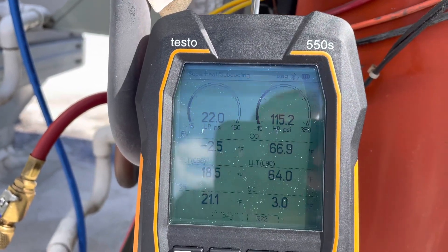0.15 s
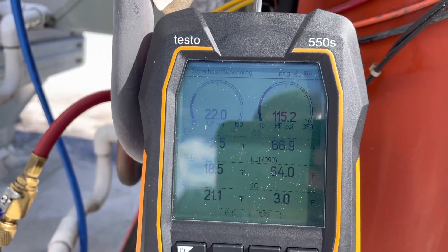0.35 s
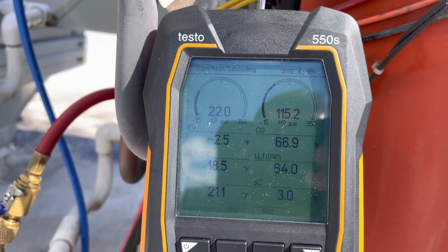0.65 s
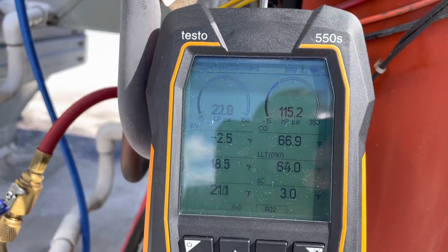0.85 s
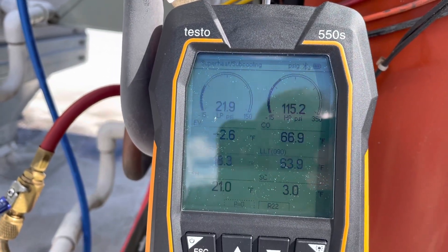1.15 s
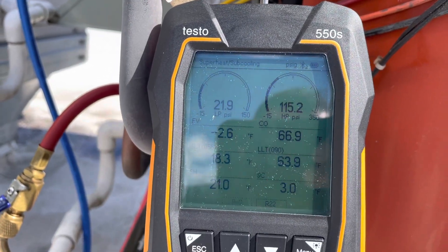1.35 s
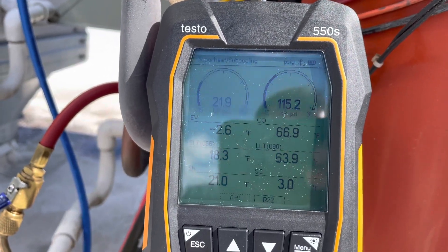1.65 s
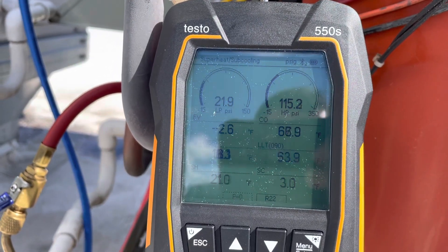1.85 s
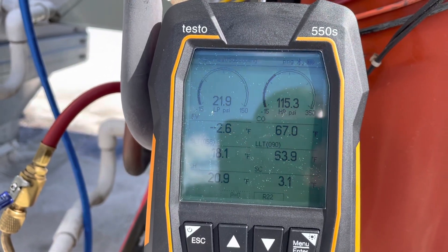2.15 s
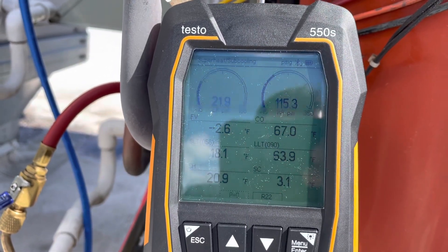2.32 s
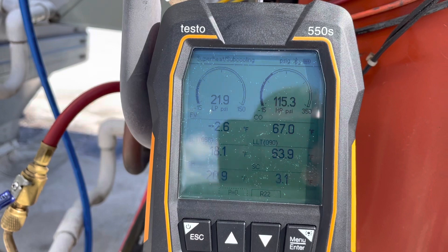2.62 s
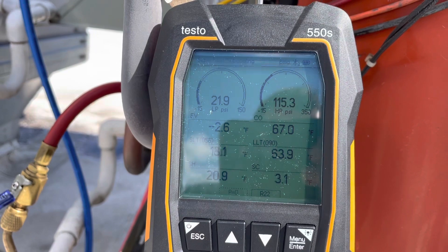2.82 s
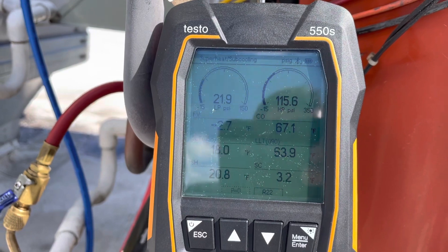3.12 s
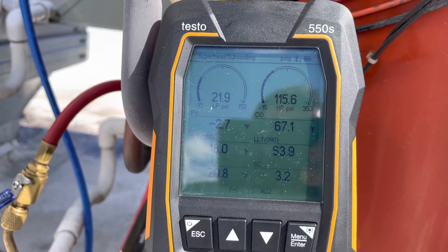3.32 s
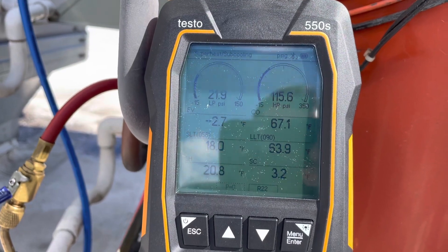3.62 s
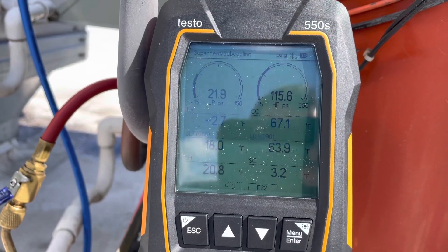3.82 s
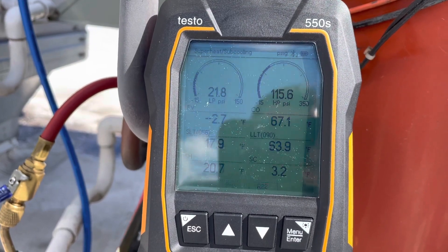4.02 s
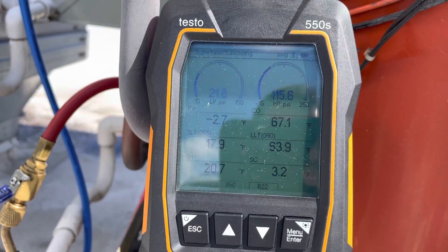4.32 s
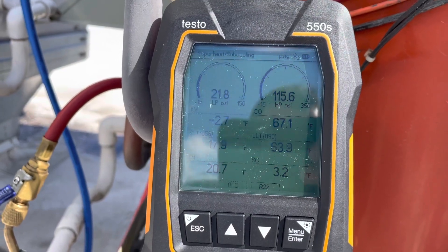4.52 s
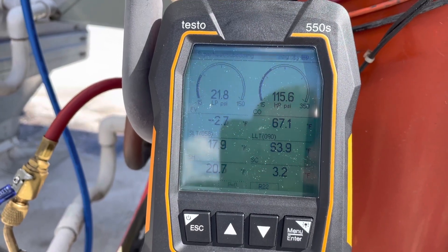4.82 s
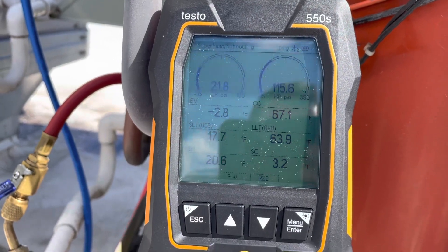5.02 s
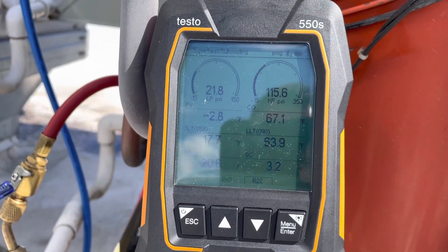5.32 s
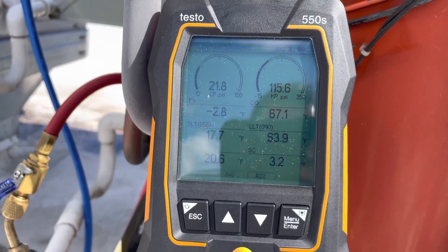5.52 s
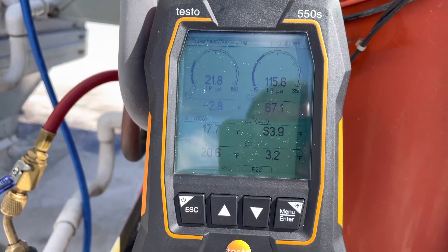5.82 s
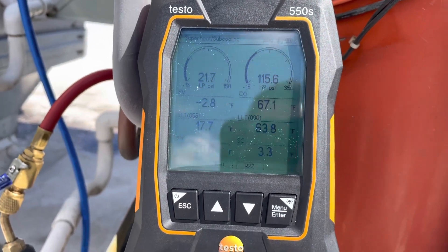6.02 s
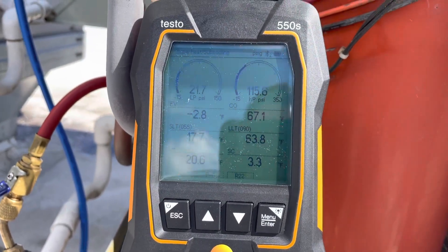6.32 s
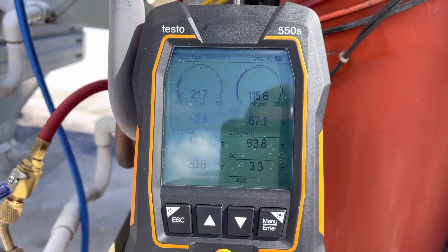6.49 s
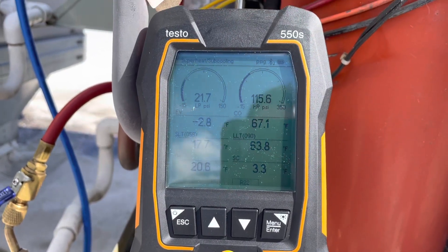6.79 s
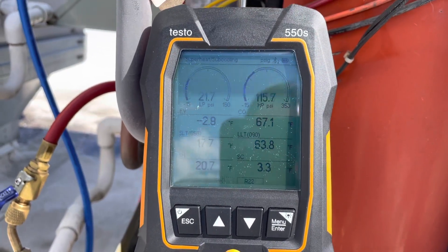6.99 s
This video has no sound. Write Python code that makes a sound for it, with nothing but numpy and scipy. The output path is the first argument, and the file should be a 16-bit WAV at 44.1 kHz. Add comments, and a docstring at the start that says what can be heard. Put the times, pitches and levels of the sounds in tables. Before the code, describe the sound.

A handheld stereo microphone near a running air conditioner picks up a constant, fast-pulsing compressor drone with fan and gas hiss. Early gusts rumble and flutter with sharp puffs around one and a half seconds. A calmer middle leaves the machine clear; late, strong gusts thud on the microphone and the buzz turns slightly duller, with more ringing.

```python
"""A rooftop, a phone with two microphone ports held close to a cooling unit in gusty wind.
Behind, the motor windings hum as steady sines, and fan air and gas hiss as shaped stereo noise.
Wind on the ports moans (a drifting sine), rumbles, flutters and rustles (noise), and single eddies puff.
In front, the compressor buzzes: a sum of shaft harmonics repeats about 59 times a second, no two turns alike."""
import sys
import numpy as np
from scipy import signal
from scipy.fft import rfft, irfft, next_fast_len
from scipy.io import wavfile
from scipy.ndimage import uniform_filter1d, map_coordinates

SR = 44100
rng = np.random.default_rng(int(sys.argv[2]) if len(sys.argv) > 2 else 0)


def persist_wave(psi):
    """Save psi, clipped to +-1, as 16-bit WAV."""
    counts = np.round(np.clip(psi, -1, 1) * 32767).astype(np.int16)
    wavfile.write(sys.argv[1], SR, np.atleast_2d(counts).T)


N = 315315  # length in samples

# Motor hum: f/Hz, level/dB (rms, before a slow waver)
MAINS_HUM = [(120, -44), (240, -45.5), (480, -46)]

# Hiss spectrum: f/Hz, relative density/dB
HISS_SPECTRUM = [(150, -120), (300, 11.5), (700, 11.5), (1300, 3.5), (1800, 1.5), (2200, 3.5), (2800, -1),
                 (3500, -3.5), (4800, 0.5), (5300, -5), (5900, -0.5), (6500, -6), (7050, 0), (7450, 2),
                 (7800, -31), (10400, -8), (12000, -12), (13400, -20.5), (14200, -17), (15700, -23)]
# Likeness of the two ports in the hiss: f/Hz, correlation (0-1)
PORT_LIKENESS = [(300, .5), (1200, .25), (2200, .55), (3000, .4), (5000, .5), (6000, .96), (7000, .75),
                 (7700, .995), (8800, .995), (9500, .85), (10800, .995), (12400, .995), (13300, .6),
                 (13900, .995)]
# Lead of the left port, for the hiss and the upper compressor tones: f/Hz, phase/rad
LEFT_LEAD = [(300, .2), (900, .8), (1500, -1), (2800, 1), (3500, 0), (4500, 1.2), (5600, .1), (6300, -.2),
             (7600, -3.14), (8800, -3.14), (10600, -6.28), (12900, -6.28), (13700, -9.42), (16000, -9.42)]

# Gusts: t/s, strength/dB, power share of the higher-pitched rumble (0-1)
GUSTS = [(0, -22.5, 0.55), (.62, -20, 0), (.76, -25, 0.04), (.9, -20.5, 0.08), (1.15, -17.5, 0.2),
         (1.45, -25.5, 0.54), (1.51, -29, .4), (1.6, -20.5, 0.3), (1.75, -24.5, 0.45), (1.92, -27.5, 0.46),
         (2.55, -29, 1), (3.45, -31, 0.76), (3.78, -27.5, 1), (4.0, -32.5, 0.96), (4.55, -33.5, 0.5),
         (4.9, -24.5, 0.75), (5.35, -27, 0.73), (5.9, -19, 0.7), (6.07, -21, 0.4), (6.22, -23, 0.5),
         (6.42, -23.5, 0.9), (6.62, -28, 0.8), (6.82, -28, 0.8), (7.15, -29.5, 0.8)]
# Brief surges in the flow: t/s, half length/s, rise of the flutter/dB, share of that rise in the rustle
FLOW_SURGES = [(1.08, 0.016, 6.5, 0.44), (1.41, 0.045, 11.5, 0.4), (1.564, 0.014, 12, 0.83),
               (1.696, 0.044, 9.5, 0.12), (2.115, 0.019, 8, 0.73), (2.448, 0.036, 6, 1.4),
               (2.612, 0.034, 4, 0.77), (2.822, 0.013, 5.5, 0.86), (2.98, 0.019, 5.5, 0.35),
               (3.286, 0.056, 5.5, 0.98), (3.777, 0.033, 5, .5), (4.098, 0.06, 4.5, 0.35),
               (4.38, 0.051, 4, 1), (5.06, 0.04, 1, .5), (5.382, 0.012, 7, .3), (5.876, 0.017, 9, 0.79),
               (5.97, 0.03, 7, .1), (6.157, 0.035, 5.5, 0.27), (6.268, 0.063, 6.5, 1.34),
               (6.575, 0.066, 7, 0.97), (6.668, 0.026, 5, 0.31), (7.046, 0.011, 10, 0.54)]
# Single eddies bursting on the ports: t/s, level/dB (nominal peak), f/Hz
EDDY_PUFFS = [(1.016, -13.5, 92), (1.077, -21, 383), (1.088, -13, 124), (1.164, -20, 73),
              (1.232, -8.5, 124), (1.404, -12.5, 482), (1.408, -11, 150), (1.412, -14, 280),
              (1.426, -11, 255), (1.434, -8, 110), (1.442, -10, 380), (1.46, -16, 330), (1.47, -7, 89),
              (1.475, -6, 267), (1.555, -13, 189), (1.656, -17, 485), (1.718, -17.5, 380),
              (2.271, -15.5, 400), (2.395, -20, 300), (2.425, -18, 600), (2.429, -20, 450),
              (2.434, -14.5, 280), (2.44, -24, 500), (2.452, -18, 400), (2.455, -13, 210),
              (2.477, -13, 380), (2.482, -21, 131), (2.487, -12.5, 437), (2.598, -12, 427),
              (2.637, -17, 298), (2.81, -14, 500), (3.271, -17, 335), (5.641, -12, 65.6), (5.721, -22, 72),
              (5.774, -11.5, 58.5), (5.791, -12.5, 142), (5.886, -2.5, 106), (5.956, -8.5, 96),
              (5.983, -7, 107), (6.135, -4.5, 88), (6.188, -8.5, 109), (6.212, -11, 74.4),
              (6.249, -7.5, 330), (6.252, -10, 145), (6.271, -8.5, 157), (6.328, -17, 96),
              (6.542, -13, 140), (6.553, -19, 200), (6.556, -16, 560), (6.561, -12, 515), (6.567, -7, 510),
              (6.572, -5, 463), (6.577, -5.5, 300), (6.58, -16, 125), (6.593, -21, 110), (6.605, -18, 332),
              (6.608, -10, 332)]
# Wind noise spectra, each: f/Hz, relative density/dB (the rumble before its shift up or down)
RUMBLE_SPECTRUM = [(12, -36), (25, -13), (40, -14), (58, 2), (75, -0.5), (110, -10.5), (150, -25),
                   (250, -19), (500, -120)]
FLUTTER_SPECTRUM = [(50, -41), (110, 3), (200, -2), (300, -5.5), (450, -20), (1200, -120)]
RUSTLE_SPECTRUM = [(150, -49), (350, 4), (600, 3.5), (1000, -8), (1600, -17), (4000, -120)]

# Lower compressor tones: multiple of the shaft speed, mid level/dB, side level/dB (rms, before variation)
SHAFT_TONES = [(1, -38, -56), (2, -47, -55), (3, -44, -59), (4, -43, -57), (5, -36, -51), (6, -43, -48),
               (7, -47, -56), (8, -35, -41), (9, -44, -55), (10, -52, -60), (11, -60, -50), (12, -50, -54),
               (13, -58, -64), (14, -47, -57), (15, -49, -54), (16, -51, -51), (17, -56, -48),
               (18, -47, -59), (19, -53, -54), (20, -60, -58), (21, -48, -48), (22, -46, -60),
               (23, -49, -60), (24, -64, -68), (25, -50, -51), (26, -63, -61), (27, -67, -65),
               (28, -64, -62), (29, -55, -63), (30, -60, -68), (31, -62, -65), (32, -52, -59),
               (33, -66, -78), (34, -53, -65), (35, -52, -61), (36, -51, -62), (37, -59, -63),
               (38, -55, -65), (39, -47, -56), (40, -57, -68), (41, -54, -67), (42, -57, -56),
               (43, -58, -67), (44, -70, -66), (45, -59, -67), (46, -51, -54), (47, -60, -60),
               (48, -59, -60), (49, -63, -71), (50, -66, -70), (51, -60, -56), (52, -66, -66),
               (53, -61, -63), (54, -54, -69), (55, -62, -74), (56, -63, -75), (57, -55, -59),
               (58, -51, -65), (59, -54, -66), (60, -58, -73), (61, -53, -72), (62, -53, -63),
               (63, -64, -68), (64, -64, -80), (65, -61, -70), (66, -51, -55), (67, -54, -62),
               (68, -57, -55), (69, -71, -67), (70, -55, -68), (71, -63, -66), (72, -53, -54),
               (73, -55, -54), (74, -63, -61), (75, -53, -54), (76, -59, -57), (77, -53, -58),
               (78, -60, -63), (79, -59, -60), (80, -59, -64), (81, -56, -74), (82, -66, -66),
               (83, -61, -68), (84, -68, -77), (85, -61, -64), (86, -67, -60), (87, -60, -65),
               (88, -57, -74), (89, -51, -68), (90, -51, -59), (91, -51, -66), (92, -53, -73),
               (93, -58, -68), (94, -58, -70), (95, -63, -74), (96, -66, -77), (97, -54, -76),
               (98, -65, -79), (99, -64, -79), (100, -59, -91), (101, -62, -94), (102, -66, -81),
               (103, -54, -73), (104, -57, -77), (105, -59, -78), (106, -63, -90), (107, -64, -76),
               (108, -63, -75), (109, -60, -69), (110, -63, -72), (111, -66, -66), (112, -64, -68),
               (113, -68, -70), (114, -68, -67), (115, -68, -67), (116, -65, -66), (117, -80, -74),
               (118, -69, -65), (119, -58, -62), (120, -76, -74), (121, -77, -70), (122, -74, -73),
               (123, -77, -80), (124, -76, -73), (125, -84, -78)]
# Higher compressor tones: f/Hz, level/dB (rms of each tone, before variation)
TREBLE_TONES = [(7400, -51), (8000, -95), (8700, -64), (9500, -66), (10100, -84), (10240, -63),
                (10400, -106), (11300, -83), (12700, -80), (13400, -94), (14200, -79), (15400, -80),
                (15700, -80)]
# When each band is struck: f/Hz, delay/turn, blur/rad
STRIKE_TIMES = [(60, .1, 1.5), (900, .25, .8), (1100, .14, .4), (1220, -.1, .2), (1290, .09, .1),
                (1600, .05, .15), (1750, 0, .4), (1900, .3, .5), (1990, .17, .4), (2030, -.21, .3),
                (2110, -.2, .3), (2200, -.55, .5), (2350, -.7, .5), (2450, -.25, .6), (2750, -.18, 1.1),
                (3050, .35, .7), (3290, .25, .5), (3340, .6, .4), (3400, .28, .4), (3470, .32, .4),
                (3520, .03, .5), (3650, 0, .6), (3720, .35, .8), (3800, -.34, .7), (4300, -.37, .3),
                (4750, -.43, .3), (5030, -.2, .6), (5200, -.45, .45), (5420, -.5, .4), (5750, -.4, .4),
                (6000, -.27, .4), (6150, -.52, .6), (6400, -.48, .7), (6550, -.35, .7), (6800, -.35, .9),
                (16000, -.44, .7)]
# Change from stroke to stroke: f/Hz, share of a tone
STROKE_ROUGHNESS = [(500, .04), (1300, .05), (2200, .1), (3500, .19), (4700, .2), (5100, .13), (5700, .13),
                    (6100, .3), (7400, .3), (8700, .8)]
# Scatter in the force of a stroke: f/Hz, level/dB
FORCE_SCATTER = [(2000, 0.62), (3500, 0), (5400, 1.23), (9000, 2.5)]
# Loss when fully sunk: f/Hz, level/dB
SUNK_LOSS = [(500, -3.5), (1100, 0), (2300, -2), (3900, -0.5), (4500, -6.5), (5000, 1.5), (5400, -1.5),
             (6300, -1.5)]
# Smearing of the strikes when fully sunk: f/Hz, phase/rad
SUNK_SMEAR = [(900, .2), (2500, .4), (3500, .6), (4400, 1), (5400, .55), (6500, .7)]
# Sinking of the tones: t/s, share of the full loss, level of the tones near RING_HZ/dB
SINKING = [(0, 0, -0.5), (1, 0.1, -1), (3, 0.07, 0), (4.2, 0.1, 1), (5.3, 0, 1.5), (5.65, 0.55, 7),
           (5.95, 0.9, 2), (6.2, 1, 5), (7.15, 0.8, -2)]

SHAFT_HZ = 59.19
WAVER, SPEED_WAVER = .08, .00006  # slow change of each tone and of the shaft speed, as shares
DRIFT = 0.16  # change of each tone over seconds as the phone sways, as a share
RING_HZ, RING_WIDE_HZ = 4070, 200
HISS_SINKS = 0.3  # share of the sinking loss, in dB, that reaches the hiss
MOAN_HZ, MOAN_DB, MOAN_DRIFT = 59.18, -4, 0.0792  # pitch, level over the gust strength, drift as a share
HIGHER = 1.33  # pitch ratio of the higher rumble to the lower
RUMBLE_DB, SURGE_RUMBLE = 0, 0.72  # level over the gust strength; share of a surge in the rumble
FLUTTER_DB, FLUTTER_GROWS = -31, 0.14  # level in an average gust; dB for each dB of strength
RUSTLE_DB, RUSTLE_GROWS = -36.5, 0.042  # likewise
SMALL_DB, SMALL_HZ, SMALL_GROWS = -28.5, 363, 0.68  # lesser eddies: base peak, middle pitch, dB per surge dB
LOW_CUT_HZ, TOP_HZ = 13, 15750
CEILING, KNEE = .9, 6  # where the phone input saturates, and how sharply


def amp(db):
    """Gain of a level in dB."""
    return 10 ** (np.asarray(db) / 20)


def unit(x):
    """Scaled to rms 1."""
    return x / np.sqrt(np.mean(np.abs(x) ** 2) + 1e-20)


def along(points, hz):
    """(f/Hz, value) points read on a log frequency axis."""
    f, v = np.transpose(points)
    return np.interp(np.log(hz + 1), np.log(f + 1), v)


def curves(rows, t):
    """Each column after the time, read at times t."""
    s, *cols = np.transpose(rows)
    return [np.interp(t, s, c) for c in cols]


def wobble(rate):
    """A smooth random curve, rate knots a second."""
    return map_coordinates(rng.standard_normal(N // 100), [np.arange(N) * rate / SR])


def filtered(x, response):
    """x filtered by a complex response of frequency."""
    m = next_fast_len(N + 8192)
    return irfft(rfft(x, m) * response(np.fft.rfftfreq(m, 1 / SR)), m)[..., :N]


def evened(x, width, depth):
    """x with its own chance swells, slower than width s, divided out by the share depth."""
    power = np.abs(uniform_filter1d(np.mean(x ** 2, axis=0), int(width * SR)))
    return unit(x / power ** (depth / 2))


def rush(spectrum, alike, lead, patchy_db):
    """Turbulent stereo noise of rms 1, in patches of random gain over time and frequency."""
    z = signal.stft(rng.standard_normal((2, N)), nperseg=512)[2]
    field = uniform_filter1d(rng.standard_normal(z.shape[1:]), size=5, axis=0)
    field = uniform_filter1d(field, size=10, axis=1)
    pair = signal.istft(z * amp(patchy_db * unit(field)), nperseg=512)[1][:, :N]

    def shared_and_opposed(hz):
        angle = np.arccos(np.clip(along(alike, hz), 0, 1)) / 2
        return amp(along(spectrum, hz)) * [np.cos(angle), np.sin(angle)]

    shared, opposed = filtered(pair, shared_and_opposed)
    ports = np.array([shared + opposed, shared - opposed])
    return unit(filtered(ports, lambda hz: np.exp(np.outer([.5j, -.5j], along(lead, hz)))))


def mains():
    """The motor windings hum at multiples of the supply, beating with the shaft tones."""
    t = np.arange(N) / SR
    return sum(amp(db + wobble(2.2)) * np.sqrt(2) * np.sin(2 * np.pi * (hz * t + rng.random()))
               for hz, db in MAINS_HUM)


def air(turn):
    """Fan and gas hiss; it swells a little once a turn as the valve lets gas out."""
    pulse = amp(0.5 * np.cos(2 * np.pi * (turn - .55)) + 0.61 * wobble(4.42))
    hiss = rush(HISS_SPECTRUM, PORT_LIKENESS, LEFT_LEAD, patchy_db=2.0)
    dull = curves(SINKING, np.arange(N) / SR)[0]
    sunk = filtered(hiss, lambda hz: amp(HISS_SINKS * along(SUNK_LOSS, hz)))
    return amp(-36.0) * pulse * ((1 - dull) * hiss + dull * sunk)


def surges(t):
    """Rise in dB of the flutter and of the rustle: a bell for each surge in the flow."""
    s, half, db, share = np.transpose(FLOW_SURGES)[:, :, None]
    bells = db * np.exp(-((t - s) / half) ** 2 / 2)
    return bells.sum(0), (share * bells).sum(0)


def moan(high):
    """Gusts sound the hollow at the ports: a drifting sine, weaker as the rumble turns higher."""
    cycles = np.cumsum(MOAN_HZ * (1 + MOAN_DRIFT * wobble(9))) / SR
    return np.sqrt(2 * (1 - high)) * np.sin(2 * np.pi * cycles)


def rumble(high):
    """Large eddies: low noise, nearly alike at both ports, crossfaded between two pitches."""
    low_part, high_part = [
        rush([(hz * k, db) for hz, db in RUMBLE_SPECTRUM], [(60, 0.96), (200, 0.72)], [(60, 0.004)],
             patchy_db=-1.5)
        for k in (HIGHER ** -.5, HIGHER ** .5)]
    return evened(np.sqrt(1 - high) * low_part + np.sqrt(high) * high_part, width=0.047, depth=0.99)


def flutter():
    """Middling eddies: faster noise, less alike at the two ports."""
    noise = rush(FLUTTER_SPECTRUM, [(130, 0.89), (300, 0.62)], [(60, 0)], patchy_db=2.0)
    return evened(noise, width=0.034, depth=0.4)


def rustle():
    """Small eddies: quickly flickering noise, least alike at the two ports."""
    flicker = amp(3.1 * wobble(60))
    return unit(flicker * rush(RUSTLE_SPECTRUM, [(300, 0.34), (800, 0.45)], [(60, 0.0093)], patchy_db=-2.0))


def buffet():
    """Turbulence on the ports: eddies of each size follow the gusts and surges in their own measure."""
    t = np.arange(N) / SR
    strength_db, high = curves(GUSTS, t)
    high = np.clip(high, 0, 1)
    gust_db = strength_db - strength_db.mean()
    surge_db, sharp_db = surges(t)
    moan_db = strength_db + MOAN_DB + 5.2 * wobble(7)
    rumble_db = strength_db + RUMBLE_DB + SURGE_RUMBLE * surge_db + 1.5 * wobble(8.6)
    flutter_db = FLUTTER_DB + FLUTTER_GROWS * gust_db + surge_db + 0.76 * wobble(13)
    rustle_db = RUSTLE_DB + RUSTLE_GROWS * gust_db + sharp_db + 0.51 * wobble(14)
    return (amp(moan_db) * moan(high) + amp(rumble_db) * rumble(high)
            + amp(flutter_db) * flutter() + amp(rustle_db) * rustle())


def small_puffs(count=150):
    """Lesser eddies at chance moments, stronger inside a surge and weaker the higher they are."""
    when, size, pitch = rng.random(count), rng.exponential(size=count), rng.standard_normal(count)
    s = when * N / SR
    peak_db = SMALL_DB + SMALL_GROWS * surges(s)[0] + 1.64 * size - 1.5 * pitch
    return np.transpose([s, peak_db, SMALL_HZ * np.exp(.35 * pitch)])


def puffs(cycles=0.39, long_hz=35, apart=0.31):
    """Each eddy is a swing or two of pressure, more for the low ones, a little unlike at the two ports."""
    out, t = np.zeros((2, N + SR)), np.arange(-3000, 3000) / SR
    eddies = np.vstack([small_puffs(), EDDY_PUFFS])
    ports = np.array([[1], [-1]])
    for (s, db, hz), (start, skew, pan) in zip(eddies, rng.standard_normal((len(eddies), 3))):
        swing = np.sin(2 * np.pi * hz * t + 9 * start + apart * skew * ports)
        bell = np.exp(-(t * hz / (cycles + long_hz / hz)) ** 2 / 2)
        at = round(s * SR)
        out[:, at:at + len(t)] += amp(db + 1.2 * pan * ports) * bell * swing
    return out[:, len(t) // 2:][:, :N]  # centres each bell on its time


def shaft_tones(hz):
    """Mid and side gains of the shaft harmonics; in the treble a lag between ports splits each tone."""
    high = amp(along(TREBLE_TONES, hz) + 1 * rng.standard_normal(len(hz)))
    half_lead = along(LEFT_LEAD, hz) / 2
    mid, side = high * np.cos(half_lead), high * np.sin(half_lead) * 1j
    order, mid_db, side_db = np.transpose(SHAFT_TONES)
    mid[:len(order)] = amp(mid_db)
    side[:len(order)] = amp(side_db) * np.exp(1j * rng.normal(0, 1.46, len(order)))
    return mid, side


def strike_phase(hz):
    """Phase that delays each band to its strike within the turn, blurred by the shell."""
    band_hz, when, blur = np.transpose(STRIKE_TIMES)
    delay = np.interp(hz - SHAFT_HZ / 2, band_hz, when)
    return -2 * np.pi * np.cumsum(delay) + np.interp(hz, band_hz, blur) * rng.standard_normal(len(hz))


def stroke_changes(hz, count):
    """Complex gain of each tone in each turn: waver, roughness, force, sinking and sway."""
    chance = rng.standard_normal((2, 2, count, len(hz)))
    slow = uniform_filter1d(chance[0], size=14, axis=1)
    quick = uniform_filter1d(chance[1], size=3, axis=2)  # neighbouring tones change together
    waver = WAVER * unit(slow[0] + 1j * slow[1])
    rough = along(STROKE_ROUGHNESS, hz) * unit(quick[0] + 1j * quick[1])
    # some strokes land harder over a wide band
    force = unit(uniform_filter1d(rng.standard_normal((count, len(hz))), size=16, axis=1))
    force_db = along(FORCE_SCATTER, hz) * force
    dull, ring_db = curves(SINKING, np.arange(count) / SHAFT_HZ)
    ring_bell = np.exp(-((hz - RING_HZ) / RING_WIDE_HZ) ** 2)
    sunk_db = np.outer(dull, along(SUNK_LOSS, hz)) + np.outer(ring_db, ring_bell)
    drift = uniform_filter1d(rng.standard_normal((2, count, len(hz))), size=90, axis=1)
    sway = 1 + DRIFT * unit(drift[0] + 1j * drift[1])
    smear = np.exp(1j * np.outer(dull, along(SUNK_SMEAR, hz) * rng.standard_normal(len(hz))))
    return (1 + waver + rough) * amp(force_db + sunk_db) * sway * smear


def compressor(turn):
    """One spectrum per shaft turn, slowly changing; the turns are played one into the next."""
    size, count = 2048, int(turn[-1]) + 3  # points in a turn, number of turns
    hz = np.arange(1, int(TOP_HZ / SHAFT_HZ) + 1) * SHAFT_HZ
    mid, side = shaft_tones(hz)
    phase = strike_phase(hz)
    ports = np.array([mid + side, mid - side])[:, None]
    tones = ports * np.exp(1j * phase) * stroke_changes(hz, count)
    with_dc = np.pad(tones, ((0, 0), (0, 0), (1, 0)))
    waves = irfft(with_dc, size) * size / np.sqrt(2)  # tone gains become rms levels
    share = np.arange(size) / size
    played = ((1 - share) * waves[:, :-1] + share * waves[:, 1:]).reshape(2, -1)
    return np.array([np.interp(turn * size, np.arange(len(p)), p) for p in played])


def scene():
    """All sources at the two ports, with one shaft angle for the compressor and the gas."""
    speed_hz = SHAFT_HZ * (1 + SPEED_WAVER * wobble(1.0) + 0.00023 * wobble(12))
    turn = np.cumsum(speed_hz) / SR  # shaft angle in turns
    return mains() + air(turn) + buffet() + puffs() + compressor(turn)


def record(dry):
    """The phone thins the deepest bass, rounds off the highest peaks and keeps nothing above its band limit."""
    thin = filtered(dry, lambda hz: (1j * hz / (1j * hz + LOW_CUT_HZ)) ** 2)
    rounded = thin / (1 + np.abs(thin / CEILING) ** KNEE) ** (1 / KNEE)
    return filtered(rounded, lambda hz: hz < TOP_HZ)


dry = scene()
out = record(dry)
persist_wave(out)
```